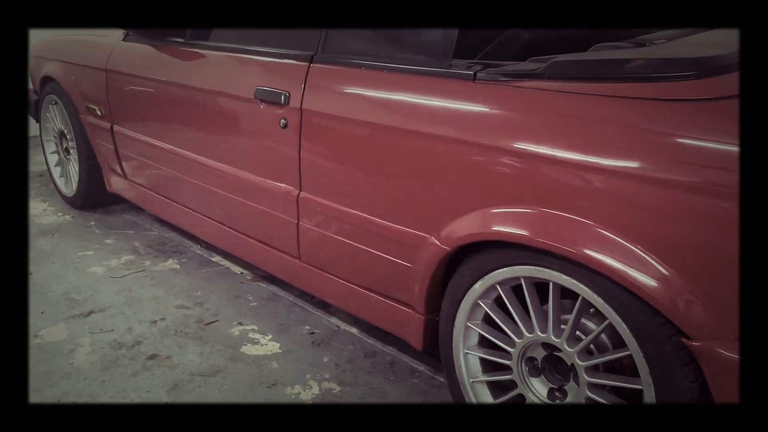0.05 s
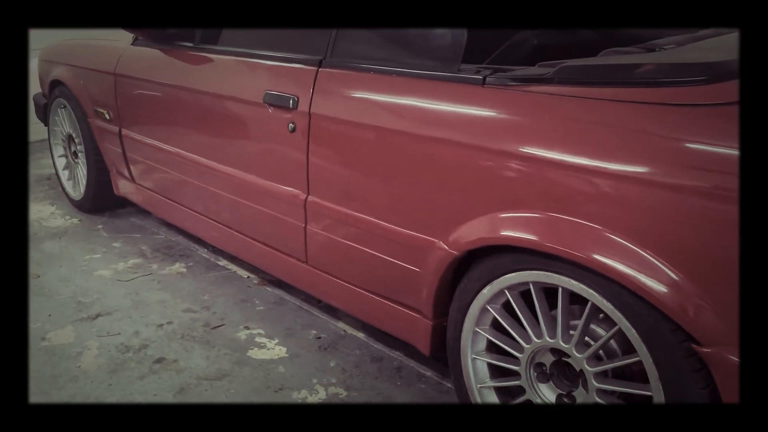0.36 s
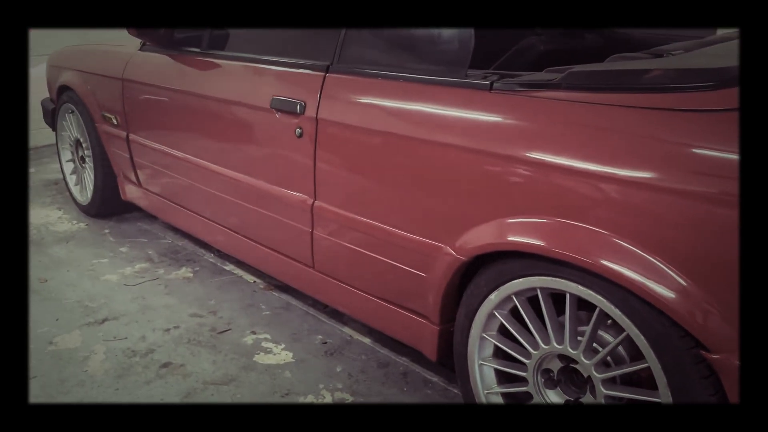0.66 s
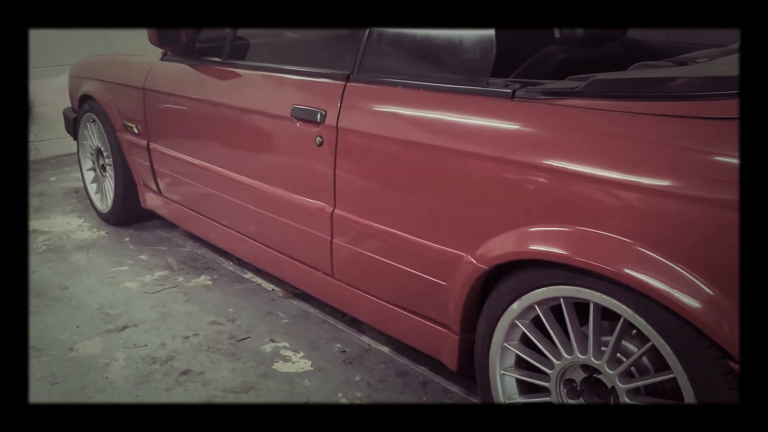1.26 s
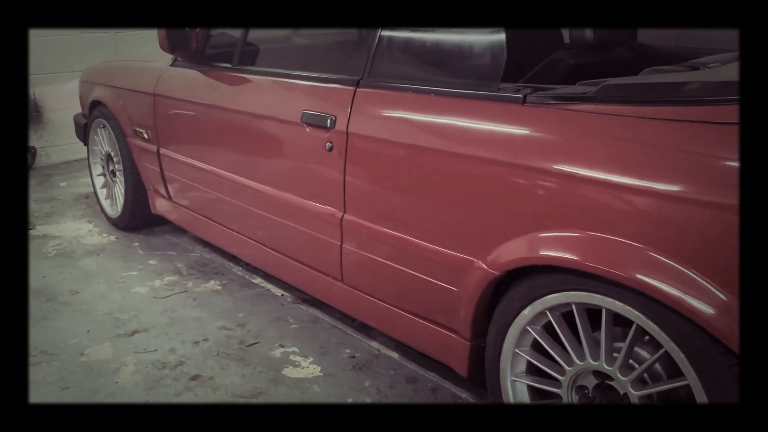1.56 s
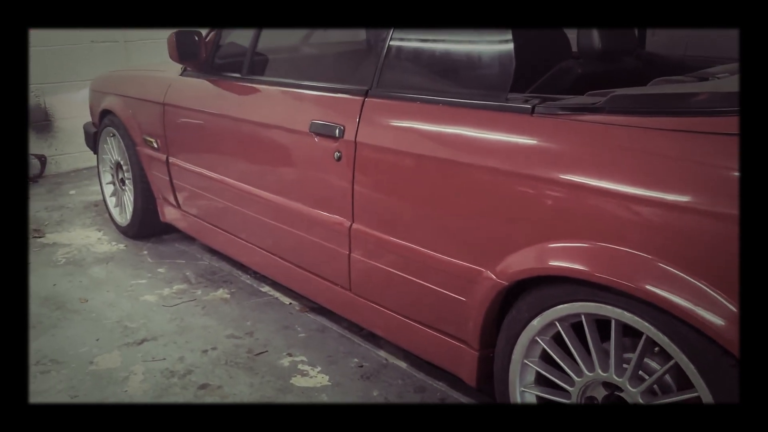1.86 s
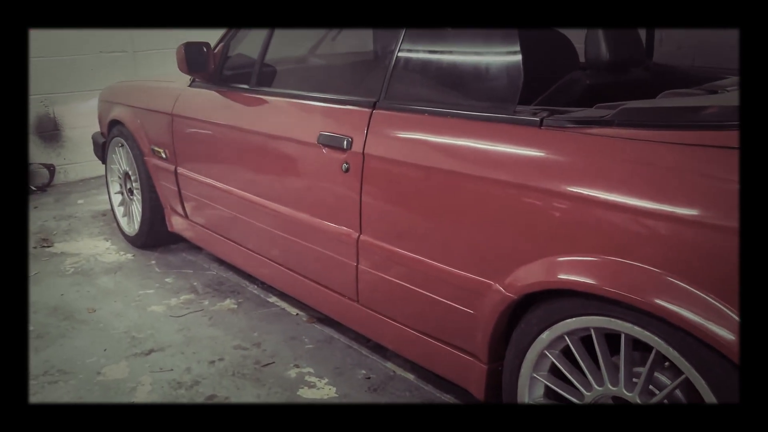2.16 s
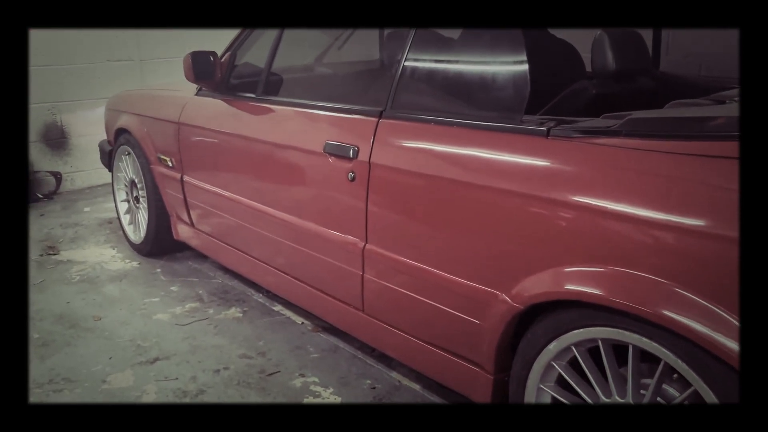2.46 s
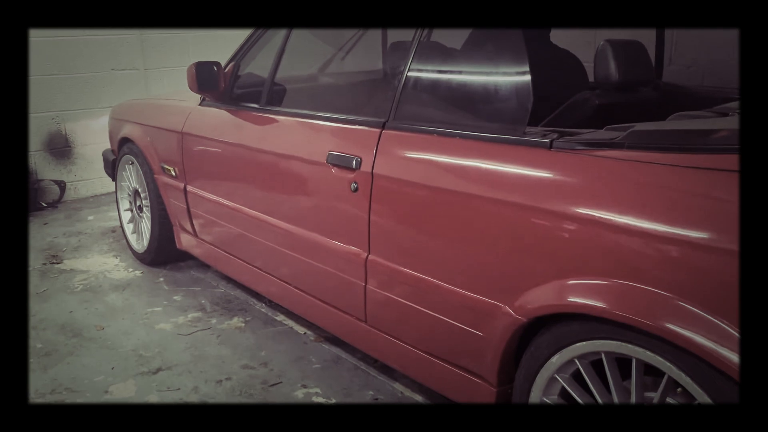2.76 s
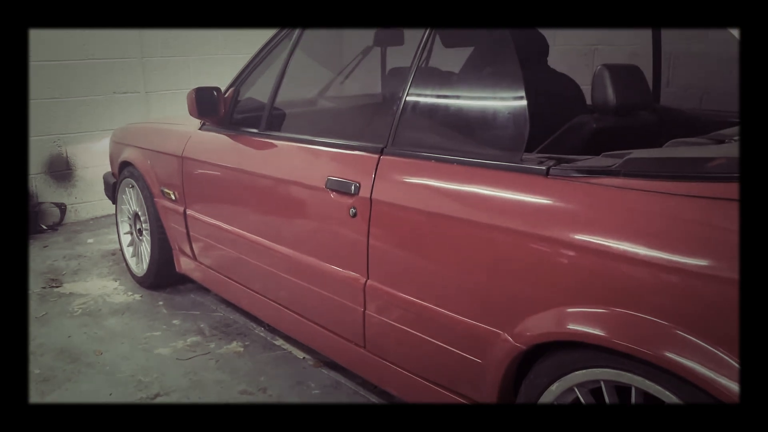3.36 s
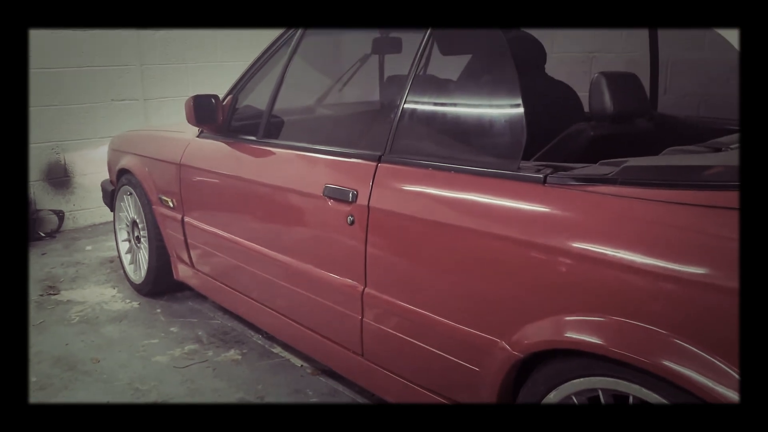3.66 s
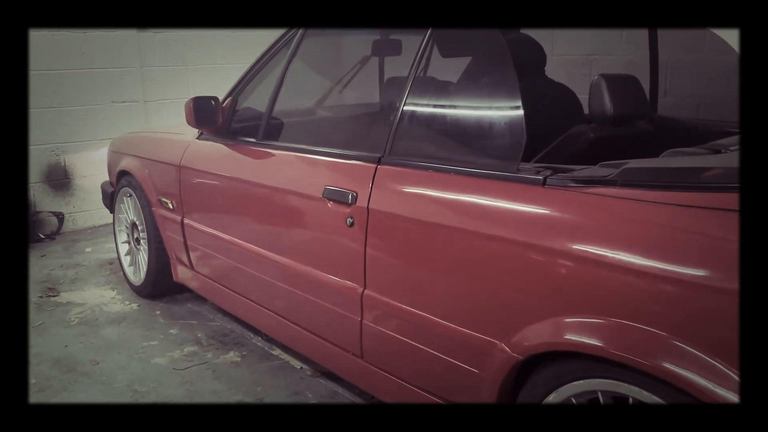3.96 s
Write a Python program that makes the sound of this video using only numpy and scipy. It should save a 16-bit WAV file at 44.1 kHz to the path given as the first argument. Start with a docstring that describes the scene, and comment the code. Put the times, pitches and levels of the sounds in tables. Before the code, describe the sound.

A car engine runs close by in a garage, its exhaust deep and booming. It revs up roughly from about 0.3 seconds, peaks between 0.7 and 1.1, and drops to a fast, burbling idle by 1.5. At 2.3 seconds it climbs again, holding raised revs from 2.7 to 4, with a stumble near 2.9. Fan rush, hiss and light valve ticks follow the revs, with faint intake rasps near the end.

```python
"""An exhaust booms in a garage: a four-cylinder engine is blipped once, falls to a fast idle, then
holds raised revs. Firings drive the pipe and room resonances, roughest as the revs first climb and
just after the blip peaks, smoother at idle, with a few misfires and deep burbles.
Fan and intake rush, gas hiss and valve ticks rise and fall with the revs.
Behind them: throttle whistle, intake rasp and one faint squeak."""
import sys
import numpy as np
from scipy import signal
from scipy.fft import rfft, irfft
from scipy.io import wavfile

SR = 44100
rng = np.random.default_rng(int(sys.argv[2]) if len(sys.argv) > 2 else 0)


def bounce(signal):
    """Save signal as a 16-bit WAV file at the path given by the first command-line argument."""
    frames = np.transpose(np.atleast_2d(signal))
    limited = np.clip(frames, -1, 1)
    pcm = np.round(limited * 32767).astype(np.int16)
    wavfile.write(sys.argv[1], SR, pcm)


N = 176400
T = np.arange(N) / SR
HZ = np.fft.rfftfreq(N, 1 / SR)
SIDES = np.array([[1], [-1]])  # left, right
BASS_PAN_DB, AIR_PAN_DB = -0.58, 0.83


def amp(db):
    """Decibels to gain."""
    return 10 ** (np.asarray(db) / 20)


def unit(x):
    """Scale to rms 1."""
    return x / np.sqrt(np.mean(x ** 2) + 1e-20)


def curve(table, column=1):
    """One column of a time table at every sample."""
    rows = np.array(table)
    return np.interp(T, rows[:, 0], rows[:, column])


def at_hz(spectrum, hz):
    """Spectrum table interpolated over log frequency."""
    f, value = np.transpose(spectrum)
    return np.interp(np.log(hz + 1), np.log(f + 1), value)


def band_pass(x, centre_hz, width_hz):
    """Gaussian band of x, rms 1."""
    return unit(irfft(rfft(x) * np.exp(-((HZ - centre_hz) / width_hz) ** 2), N))


def drift(hz):
    """Slow random wander, rms 1."""
    return band_pass(rng.standard_normal(N), 0, hz)


def noise_band(centre_hz, width_hz):
    """Uncorrelated stereo noise band, rms 1."""
    return band_pass(rng.standard_normal((2, N)), centre_hz, width_hz)


def bell(peak_s, width_s):
    """Gaussian envelope, peak 1."""
    return np.exp(-((T - peak_s) / width_s) ** 2)


def onsets(firings):
    """Sample index of each firing."""
    return np.flatnonzero(np.diff(np.floor(firings)) > 0)


# Regular firing: t/s, level/dB, added tilt/(dB/octave), half orders/dB
ENGINE_LOAD = [(.04, -4.5, -2.5, -1), (.18, 4, -4.5, -14), (.28, -3.5, -3, -4), (.43, -3, 0, -4),
               (.54, -1, -0.5, -2), (.67, 3, 1, -18), (.76, -1.5, 0.5, -28), (.9, 0.5, -1, -20),
               (1.04, -1.5, 0, -7), (1.17, -5, -7.5, -25), (1.3, -6, -2, -4), (1.44, -16, -2.5, 4.5),
               (1.52, -6, -4, 4.5), (1.66, -3, 0, -15.5), (1.78, -4, -5.5, -10), (1.93, 6, -6, -30),
               (2.12, 1.5, -4, -18), (2.26, -6, -4, 1), (2.39, -5, -2.5, 4.5), (2.47, 0.5, -5, -6),
               (2.54, -0.5, 3, -34), (2.62, -1, 0.5, -15), (2.71, 2, 0.5, -13), (2.8, 0.5, -1, -9.5),
               (3.0, -0.5, -1, 2), (3.22, -1.5, -7, -10), (3.42, 0, -0.5, -12), (3.6, -1.5, 0.5, -13),
               (3.83, -1.5, 0.9, -13.5), (4, -2.5, -4.5, -7)]
# Firing unevenness: t/s, level/dB
UNEVENNESS = [(0, -5), (.2, -2), (.45, 12), (.6, -2), (.76, -5), (.84, 6.5), (1.05, 3.5), (1.4, -1.5),
              (1.8, -8), (2.2, -3.5), (2.42, 0.5), (2.54, -9), (2.72, -3), (2.83, -1), (3.3, 0.5),
              (3.48, -4.5), (3.65, -1.5), (4, -4)]
# Misfires: t/s, width/s, depth/(0-1), thump/dB
MISSED_FIRINGS = [(0.104, 0.039, 0.8, -26), (0.813, 0.015, 0.83, -0.5), (.968, 0.035, 0.62, -18),
                  (1.114, 0.036, 0.52, -17), (1.613, 0.021, 0.63, -24), (1.716, .025, 0.62, -22),
                  (2.01, 0.031, .8, -29), (2.87, 0.078, 0.79, -4), (3.918, .021, 0.98, -10)]
# Pipe and garage response: f/Hz, gain/dB
PIPE_RESPONSE = [(20, -27), (36, -24), (46, -16), (53, -10), (59, -2), (68, -8), (78, -3), (87, 0.5),
                 (93, 2.5), (108, -3.5), (122, -10.5), (142, 0), (165, -4.5), (177, -8.5), (186, -25),
                 (210, -12.5), (226, -13), (250, -22.5), (264, -18), (277, -7), (305, -33.5), (343, -17.5),
                 (372, -36.5), (600, -31)]


def exhaust_tone(rate_hz, firings):
    """Firing orders, and half orders from unequal cylinders, sweep through the pipe response."""
    tilt_db_per_octave = curve(ENGINE_LOAD, column=2) - 4
    half_order_db = curve(ENGINE_LOAD, column=3)
    flutter_depth = .14 * amp(curve(UNEVENNESS))
    tone = np.zeros(N)
    for order in np.arange(1, 13) / 2:
        level_db = at_hz(PIPE_RESPONSE, order * rate_hz) + tilt_db_per_octave * np.log2(max(order, 1))
        level_db -= 1.5 * max(order - 4, 0)
        if order % 1:
            level_db += half_order_db / max(order - .5, 1)
        flutter = 1 + flutter_depth * drift(hz=13.4)
        tone += amp(level_db) * flutter * np.cos(2 * np.pi * (order * firings + rng.random()))
    for t, width_s, depth, _ in MISSED_FIRINGS:
        tone *= 1 - depth * bell(t, width_s)
    return np.sqrt(2) * amp(curve(ENGINE_LOAD) - 12.5) * tone


def uneven_kicks(firings):
    """One kick per firing: its random departure from mean strength."""
    at, kicks = onsets(firings), np.zeros(N)
    kicks[at] = rng.uniform(-0.88, 1, N)[:len(at)]
    return kicks


def ring(kicks, modes):
    """Kicks ring a set of damped resonances."""
    t = T[:SR // 2]
    response = sum(amp(db) * np.exp(-np.pi * width_hz * t) * np.sin(2 * np.pi * hz * t)
                   for hz, width_hz, db in modes)
    edges_hz = [.75 * modes[0][0], 1.3 * modes[-1][0]]
    band = signal.butter(3, edges_hz, "band", fs=SR, output="sos")
    return signal.sosfilt(band, signal.fftconvolve(kicks, response)[:N])


# Low pipe modes: f/Hz, width/Hz, level/dB
BOOM_MODES = [(55.2, 10, 0), (89, 5.3, -6.5), (103.3, 8.2, -1), (139.9, 18.5, 1.5), (158.2, 8, -8.5)]
# High pipe modes: f/Hz, width/Hz, level/dB
BARK_MODES = [(207.6, 6.2, -10.5), (230.3, 9.5, -10), (264, 28, -8), (294, 11, -25), (343, 5, -21)]


def exhaust_lumps(firings):
    """Uneven firings and misfires ring the pipe; its high modes grow with the airflow."""
    boom_kicks = uneven_kicks(firings) * amp(curve(UNEVENNESS))
    for t, _, _, thump_db in MISSED_FIRINGS:
        boom_kicks[int(t * SR)] -= amp(thump_db + 9)
    flow_db = curve(AIRFLOW) - curve(AIRFLOW).max()
    bark_kicks = uneven_kicks(firings) * amp(.65 * flow_db + .5 * curve(UNEVENNESS))
    return amp(-23.5) * ring(boom_kicks, BOOM_MODES) + amp(-19.5) * ring(bark_kicks, BARK_MODES)


# Deep burbles: t/s, level/dB
BURBLE_PEAKS = [(.06, -22.5), (.14, -21.5), (.825, -21), (.98, -20), (1.075, -18), (1.16, -28),
                (1.295, -20), (1.39, -20.5), (1.585, -22), (1.7, -22), (1.85, -23), (1.96, -31),
                (2.075, -26), (2.835, -18), (2.92, -20.5), (3.08, -26), (3.235, -19), (3.335, -29),
                (3.56, -29), (3.715, -29), (3.835, -27)]


def deep_boom(firings, mode_hz=36, rise_s=.015, fall_s=.06):
    """The lowest resonance of pipe and garage swells in burbles over a faint rumble."""
    rumble = band_pass(uneven_kicks(firings), mode_hz, width_hz=10)
    swells = [amp(db) * bell(t, np.where(T < t, rise_s, fall_s)) for t, db in BURBLE_PEAKS]
    boom = np.sqrt(2) * np.cos(2 * np.pi * mode_hz * T + .35 * drift(hz=10))
    return np.linalg.norm(swells, axis=0) * boom + amp(-41) * rumble


# Left-right coherence: f/Hz, coherence/(0-1)
AIR_COHERENCE = [(130, 1), (260, 0.2), (500, 1), (1000, 0.22), (2500, 0.11), (5000, 0), (8000, 0.71),
                 (14000, 1)]
# Engine-bay panel resonances: f/Hz, width/Hz, gain/dB
PANEL_MODES = [(439, 31, 3), (676.5, 38, 5.5), (791, 49, 4.5), (957.6, 26, 9), (1202, 20, 7),
               (1310, 12, 5.5), (1430, 11, 5), (1540, 23, 7), (1946, 13, 6), (3840, 670, 3)]


def bay_noise(spectrum, left_lag_s=.000227):
    """Partly diffuse air noise, coloured by the panels, arriving on the right first."""
    right, diffuse = rfft(rng.standard_normal((2, N)))
    coherence = at_hz(AIR_COHERENCE, HZ)
    left = coherence * right + np.sqrt(1 - coherence ** 2) * diffuse
    left *= np.exp(-2j * np.pi * HZ * left_lag_s)
    panels_db = sum(db / (1 + (2 * (HZ - hz) / width_hz) ** 2) for hz, width_hz, db in PANEL_MODES)
    return unit(irfft(np.array([left, right]) * amp(at_hz(spectrum, HZ) + panels_db), N))


# Air noise levels: t/s, rush/dB, hiss/dB, fizz/dB
AIRFLOW = [(0.03, -47, -55.5, -57), (0.21, -60.5, -55.5, -57), (0.28, -50, -52, -51),
           (0.44, -45, -53.5, -51), (0.73, -39.5, -51, -48.5), (0.87, -42, -50.5, -52),
           (1.11, -43, -53.5, -53.5), (1.24, -47, -56.5, -56.5), (1.73, -58.5, -58.5, -61),
           (2.22, -51, -58, -57.5), (2.43, -43.5, -54.5, -53.5), (2.7, -40.5, -54, -51.5),
           (3.28, -42, -54.5, -53.5), (3.52, -40.5, -53, -52), (3.87, -39.5, -52, -50.5),
           (3.94, -41, -54, -53), (3.95, -40, -54.5, -52.5)]
# Fan and intake spectrum: f/Hz, density/dB
RUSH_SPECTRUM = [(100, 4.5), (200, 2.5), (300, 1), (420, 3), (580, 0.5), (800, -1), (1120, -0.5), (1500, 1),
                 (2000, -1), (2600, -9.5), (4000, -15.5), (8000, -28.5)]
# Accessory spectrum: f/Hz, density/dB
WHIRR_SPECTRUM = [(200, 4.5), (340, 3.5), (500, -0.5), (1000, 1), (1500, -4), (2300, -9.5), (5000, -27)]


def air_rush(firings):
    """Fan and intake air pulses with each stroke over the steady whirr of the accessories."""
    pulse = 1 + .061 * np.cos(2 * np.pi * firings)
    rush = amp(curve(AIRFLOW) + 4.5) * bay_noise(RUSH_SPECTRUM) * pulse
    return rush + amp(-47.5) * bay_noise(WHIRR_SPECTRUM)


def valve_ticks(firings, spread_db=4, decay_s=.0016):
    """Envelope of valve impacts, one per firing, random in strength."""
    at, impacts = onsets(firings), np.zeros(N)
    impacts[at] = amp(-spread_db * np.clip(rng.standard_normal(N)[:len(at)], -2, 2))
    return unit(signal.lfilter([1], [1, -np.exp(-1 / (decay_s * SR))], impacts))


# Gas hiss spectrum: f/Hz, density/dB
HISS_SPECTRUM = [(1000, -9.5), (2500, -0.5), (3800, 1), (5500, 2.5), (7000, 0.5), (9000, -11), (15000, -16)]
# Top fizz spectrum: f/Hz, density/dB
FIZZ_SPECTRUM = [(4000, -4), (7000, -9), (9000, 2), (11000, -1), (13200, -2.5), (15000, -2.5)]


def gas_hiss(firings):
    """Hiss and fizz flicker and puff at each firing; valves tick through them."""
    ticks = amp(-22) * valve_ticks(firings)
    puffs = 1 + .02 * np.cos(2 * np.pi * firings) + .08 * drift(hz=24.9) + ticks
    hiss = amp(curve(AIRFLOW, column=2) + 4) * bay_noise(HISS_SPECTRUM) * amp(SIDES * AIR_PAN_DB)
    fizz = amp(curve(AIRFLOW, column=3) + 3) * bay_noise(FIZZ_SPECTRUM)
    return puffs * (hiss + fizz)


# Throttle suction on the blip: t/s, level/dB
THROTTLE_SUCTION = [(.2, -71), (.29, -56), (.5, -52), (.66, -64)]


def throttle_whistle():
    """Air whistles broadly past the opening throttle plate."""
    return amp(curve(THROTTLE_SUCTION)) * noise_band(centre_hz=5300, width_hz=980)


# Rasp at raised revs: t/s, level/dB
RASP_PEAKS = [(2.56, -48), (3.555, -40), (3.7, -42), (3.84, -43)]


def intake_rasp():
    """The intake rasps in short surges."""
    surges = sum(amp(db) * bell(t, width_s=.033) for t, db in RASP_PEAKS)
    return surges * noise_band(centre_hz=1710, width_hz=320)


def squeak():
    """One brief, narrow whistle."""
    return amp(-59) * bell(peak_s=1.58, width_s=.06) * noise_band(centre_hz=5750, width_hz=170)


def garage_echoes(source, t60_s=.28, low_cut_hz=186):
    """Diffuse wall echoes with the bass cut."""
    tail = rng.standard_normal(SR // 2) * amp(-60 * T[:SR // 2] / t60_s)
    echoes = signal.fftconvolve(source, tail / np.linalg.norm(tail))[:N]
    high_pass = signal.butter(3, low_cut_hz, "high", fs=SR, output="sos")
    return amp(-6.5) * signal.sosfilt(high_pass, echoes)


# Engine speed: t/s, firing rate/Hz
FIRING_RATE = [(0, 49.7), (.13, 42.8), (.2, 45), (.28, 53), (.35, 52.6), (.47, 62.6), (.55, 67),
               (.61, 78.4), (.73, 88.5), (.92, 84.3), (1.1, 87.4), (1.3, 65), (1.45, 53), (1.55, 41.3),
               (1.65, 45.4), (1.8, 39.5), (1.95, 45), (2.1, 43.5), (2.2, 47.3), (2.3, 49), (2.42, 63),
               (2.6, 80.3), (2.76, 83.8), (3.05, 84.3), (3.22, 79.8), (3.36, 82.6), (3.45, 89.3),
               (3.62, 88.3), (3.86, 92.7), (4, 85.3)]


def scene():
    """One crankshaft times exhaust, rush and hiss; the bass stands in the room almost in mono."""
    rate_hz = curve(FIRING_RATE) * (1 + .0044 * drift(hz=14))
    firings = np.cumsum(rate_hz) / SR  # phase, one cycle per firing
    exhaust = exhaust_tone(rate_hz, firings) + exhaust_lumps(firings) + deep_boom(firings)
    side = .12 * signal.hilbert(exhaust).imag + garage_echoes(exhaust)
    bass = (exhaust + SIDES * side) * amp(SIDES * BASS_PAN_DB)
    rush = air_rush(firings) * amp(SIDES * AIR_PAN_DB)
    return bass + rush + gas_hiss(firings) + throttle_whistle() + intake_rasp() + squeak()


def record(dry):
    """3 ms end fades, 15.2 kHz low-pass."""
    fades = np.clip(np.minimum(T, T[-1] - T) / .003, 0, 1)
    low_pass = signal.firwin(511, 15200, window=("kaiser", 9), fs=SR)
    return signal.oaconvolve(dry * fades, low_pass[None], "same")


dry = scene()
out = record(dry)
bounce(out)
```